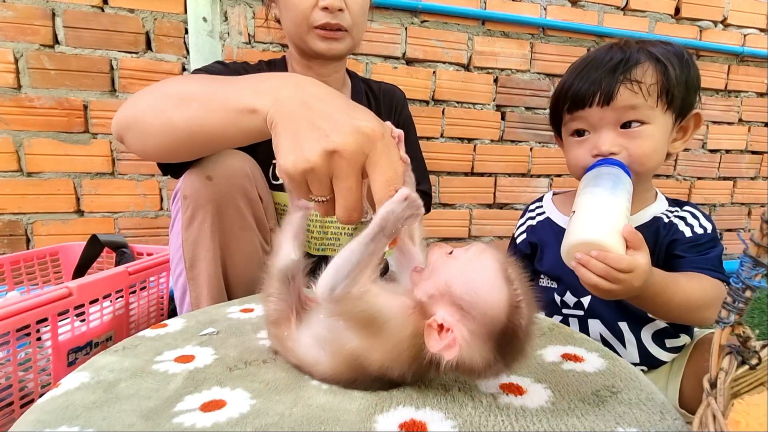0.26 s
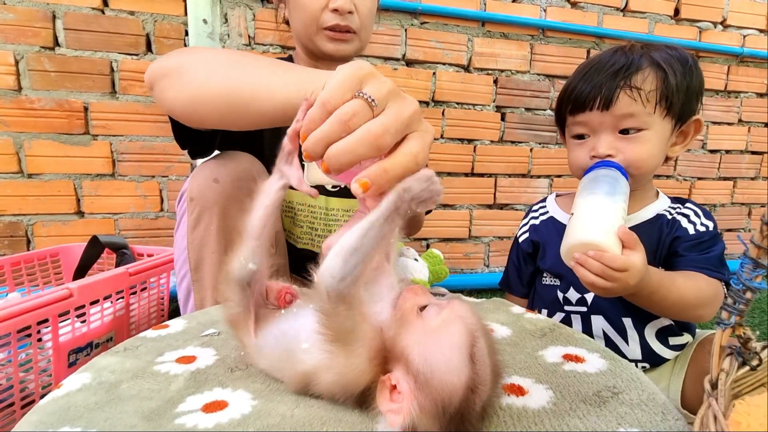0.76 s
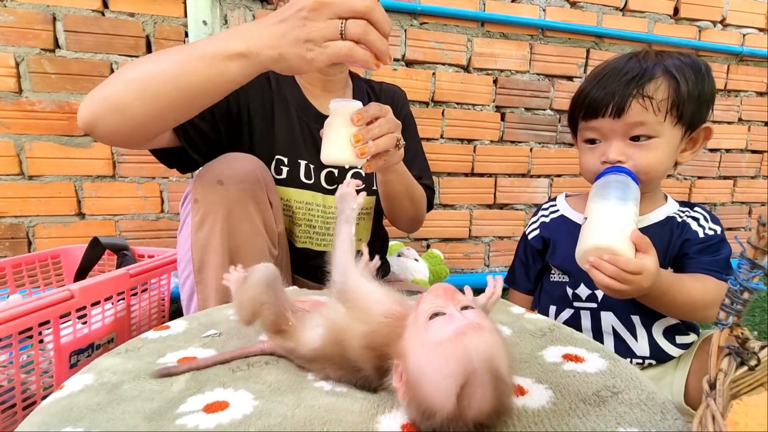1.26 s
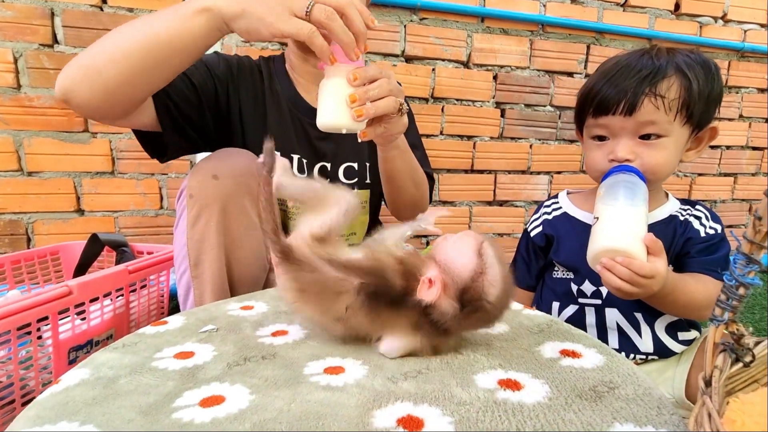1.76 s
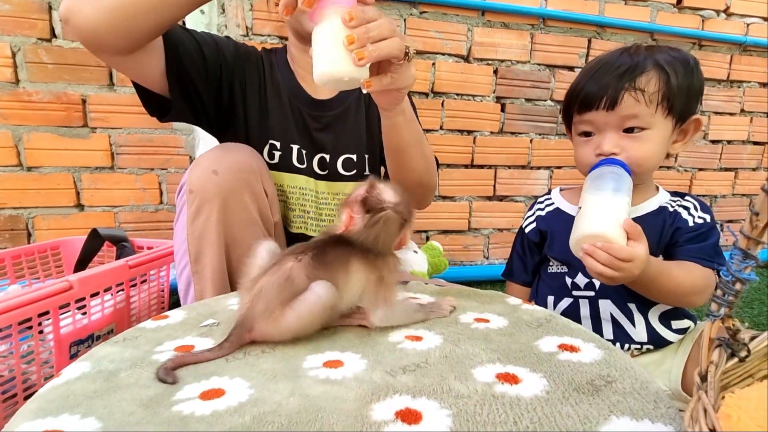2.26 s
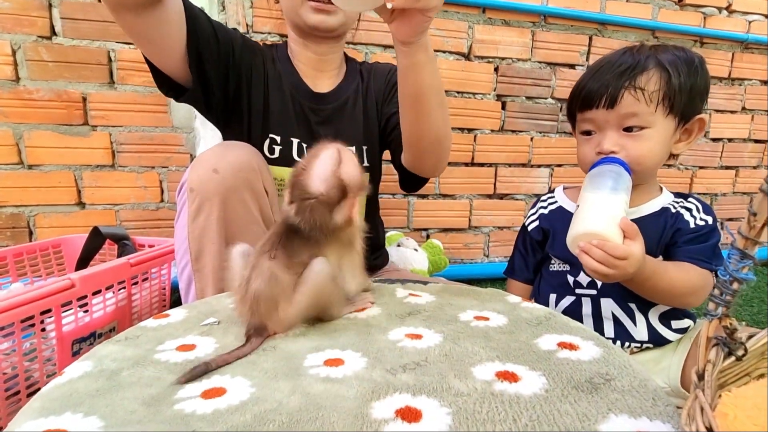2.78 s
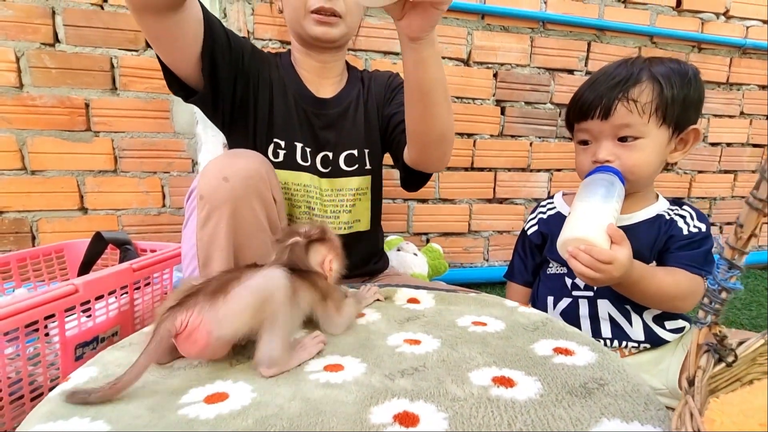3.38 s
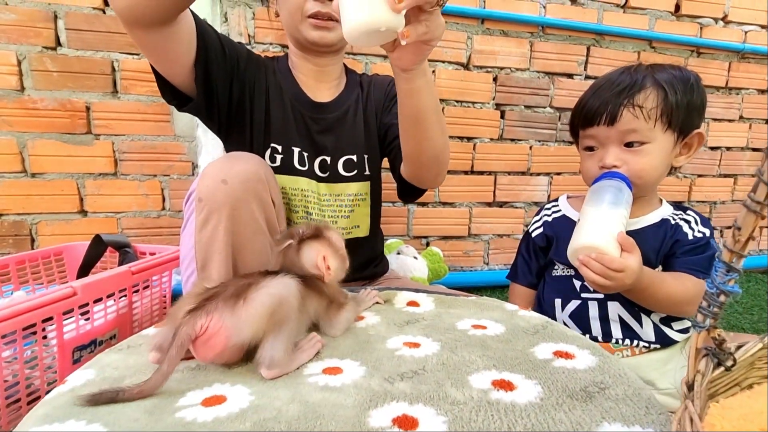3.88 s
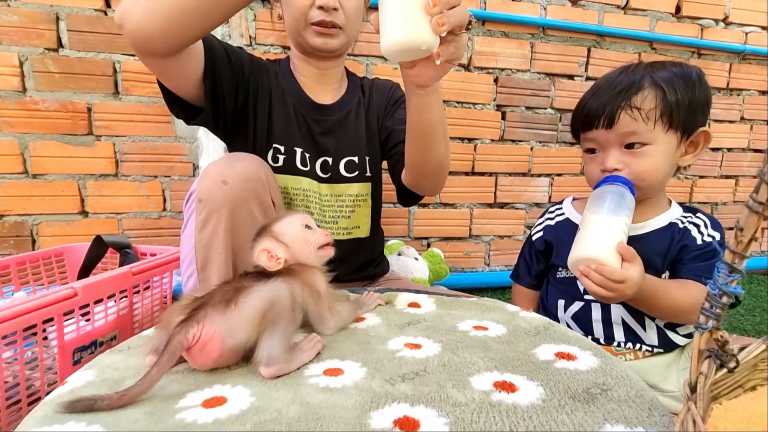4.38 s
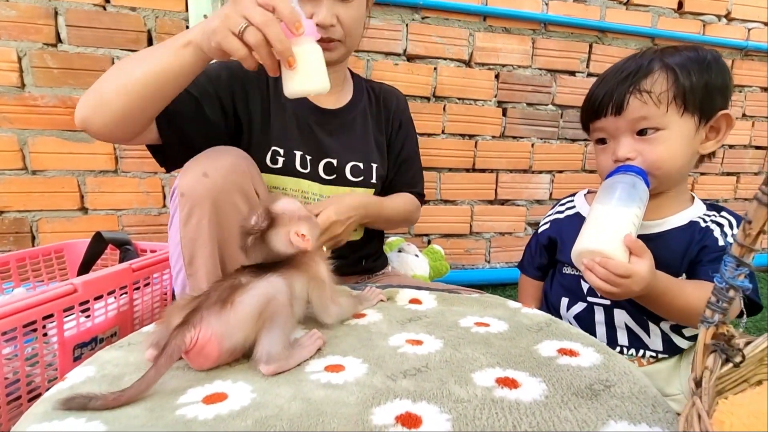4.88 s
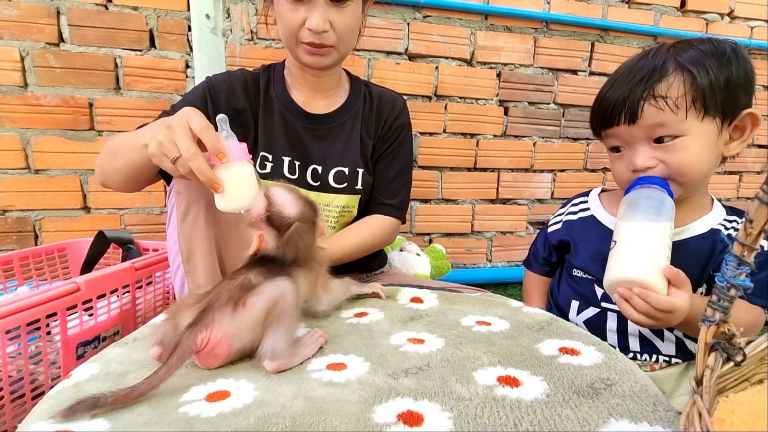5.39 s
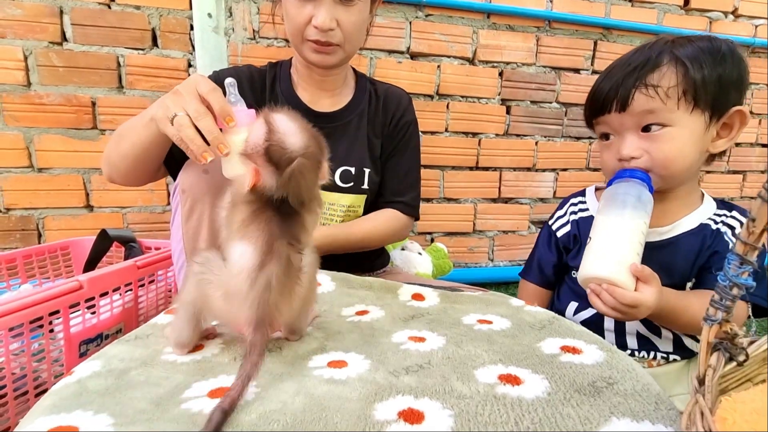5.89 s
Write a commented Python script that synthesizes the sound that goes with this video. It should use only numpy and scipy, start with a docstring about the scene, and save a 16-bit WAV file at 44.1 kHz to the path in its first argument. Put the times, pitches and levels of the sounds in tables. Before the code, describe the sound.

A hungry baby monkey shrieks and yelps in rapid, rasping high-pitched bursts, then tires into shorter yelps and hoarse low moans, close up.

```python
"""A hungry baby monkey cries on a blanket before a brick wall, close to two microphone ports.
Fold pulses pass a throat whose colour follows pitch and mouth: rasping screams leap to squeals,
yelps slide down, squawks arch, and slack folds end it all in hoarse low moans.
Short wavering tones make the first yelp's low tail, soft low grunts and a bright overtone atop one shriek.
Filtered noise scuffs the cloth; reflections, dull noise, a swelling rumble and a faint hum surround it."""
import sys
import numpy as np
from scipy import signal
from scipy.fft import rfft, irfft, next_fast_len
from scipy.io import wavfile
from scipy.ndimage import uniform_filter1d, minimum_filter1d

SR = 44100
rng = np.random.default_rng(int(sys.argv[2]) if len(sys.argv) > 2 else 0)


def bounce(signal):
    """Save signal as a 16-bit WAV file at the path given by the first command-line argument."""
    frames = np.transpose(np.atleast_2d(signal))
    limited = np.clip(frames, -1, 1)
    pcm = np.round(limited * 32767).astype(np.int16)
    wavfile.write(sys.argv[1], SR, pcm)


N = 270774
TIME = np.arange(N) / SR
EDGE_HZ = 16100  # top of the band, for the fold overtones and the final filter


def gain_of(db):
    """Decibels to amplitude."""
    return 10 ** (np.asarray(db) / 20)


def evened(x):
    """Scales to rms 1."""
    return x / np.sqrt(np.mean(x ** 2) + 1e-20)


def read(points, hz):
    """Reads (frequency [Hz], value) points on a log-frequency axis."""
    f, value = np.transpose(points)
    return np.interp(np.log(hz + 1), np.log(f + 1), value)


def add(mix, s, sound):
    """Mixes a sound in at time s."""
    part = mix[max(round(s * SR), 0):][:len(sound)]
    part += sound[:len(part)]


def shaped(x, response):
    """Filters x by a gain that is a function of frequency."""
    size = next_fast_len(x.shape[-1] + 2048)
    spectrum = rfft(x, size) * response(np.fft.rfftfreq(size, 1 / SR))
    return irfft(spectrum, size)[..., :x.shape[-1]]


def resonate(x, hz, width):
    """A steep resonance of gain 1: the same peak filter twice."""
    b, a = signal.iirpeak(hz, hz / width, SR)
    return signal.lfilter(b, a, signal.lfilter(b, a, x))


def flutter(top_hz):
    """Random wavering of rms 1, rolled off steeply above top_hz."""
    return evened(shaped(rng.standard_normal(N), lambda f: 1 / (1 + (f / top_hz) ** 4)))


def per_cycle(turns, cycles):
    """A random value that glides to a new one every so many cycles (at least one)."""
    return np.interp(turns / max(cycles, 1), np.arange(N), rng.standard_normal(N))


# Colour of the noise floor: (frequency [Hz], level [dB])
FLOOR_COLOUR = [(25, -11), (65, 1), (170, -11.5), (270, -18), (1600, -33), (4200, -24.5), (7000, -38.5),
                (16000, -51)]
# Swell of the rumble: (time [s], level [dB])
RUMBLE_SWELL = [(.08, -62), (.2, -39.5), (.46, -43), (.65, -48), (2.2, -59)]
HUM_HZ, HUM_DB, HUM_OCTAVE_DB = 87, -55, -7.5  # the octave is relative to the fundamental


def background(shared_hz=350, apart=0.67, floor_db=-53, rumble_hz=88, rumble_width_hz=50):
    """Dull noise shared by both ports in the bass, separate hiss, a booming rumble and a wavering hum."""
    noise = rng.standard_normal((3, N))
    air = evened(shaped(noise, lambda f: gain_of(read(FLOOR_COLOUR, f))))
    low = shaped(air, lambda f: 1 / (1 + (f / shared_hz) ** 4))
    hiss = (air - low)[:2]
    floor = gain_of(floor_db) * (low[2] + apart * low[:2] + hiss)
    boom = evened(resonate(rng.standard_normal(N), rumble_hz, rumble_width_hz))
    rumble = boom * gain_of(np.interp(TIME, *np.transpose(RUMBLE_SWELL)))
    phase = 2 * np.pi * np.cumsum(HUM_HZ * (1 + 0.0088 * flutter(top_hz=6.3))) / SR
    hum = evened(np.sin(phase) + gain_of(HUM_OCTAVE_DB) * np.sin(2 * phase))
    return floor + rumble + gain_of(HUM_DB) * hum


def echoes(x, near_db=-14, near_s=0.032, tail_db=-22, tail_t60=.31):
    """Quick sparse reflections from bodies and wall, with a faint dense tail."""
    t = np.arange(SR // 2) / SR
    sparse = rng.random((2, len(t))) < 1500 / SR  # about 1500 reflections per second
    near = rng.standard_normal((2, len(t))) * sparse * np.exp(-t / near_s) * (t > .002)
    tail = rng.standard_normal((2, len(t))) * (t > .008) * np.exp(-np.log(1000) * t / tail_t60)
    taps = (gain_of(near_db) * evened(near) + gain_of(tail_db) * evened(tail)) / np.sqrt(len(t))
    return signal.fftconvolve(x[None], taps, axes=1)[:, :N]


def scatter(x, count=8):
    """Short paths off hands, bottle and body come and go as the monkey tosses its head."""
    strength, longest_s, changes_per_s = .22, .003, 35
    out = np.zeros((2, N))
    for port in out:
        for delay in rng.uniform(0, longest_s, count):
            port += strength * per_cycle(TIME * changes_per_s, 1) * np.roll(x, int(delay * SR))
    return out


# The two ports hear the monkey differently: (frequency [Hz], left minus right [dB])
PORT_TILT = [(300, 2), (1300, 2.5), (2600, -4), (3200, -2), (4700, -11), (9000, 1.5), (12500, -3)]


def ports(x, lead=1.897, level_off_hz=1100):
    """The left port leads by a phase (radians) that levels off; the housing colours each side."""
    def response(f):
        ratio = gain_of(read(PORT_TILT, f))
        lag = np.exp(-1j * lead * np.tanh(f / level_off_hz))
        return np.array([ratio, lag]) * np.sqrt(2 / (1 + ratio ** 2))
    return shaped(x, response)


# The monkey tumbles and scrambles on the blanket: (start [s], length [s], level [dB])
CLOTH_SCUFFS = [(1.147, 0.15, -48.5), (2.863, 0.11, -44)]


def scuffs(low_hz=160, high_hz=230):
    """Dull puffs of band-limited noise: a small body rubbing on cloth."""
    def dull_band(f):
        return f ** 4 / (f ** 4 + low_hz ** 4) / (1 + (f / high_hz) ** 3)
    cloth = evened(shaped(rng.standard_normal(N), dull_band))
    puffs = 0
    for s, length, db in CLOTH_SCUFFS:
        puffs = puffs + gain_of(db) * np.sin(np.pi * np.clip((TIME - s) / length, 0, 1))
    return cloth * puffs


def note(length, hz, level_db, waver, count, slope_db=0):
    """A short wavering tone with count partials, each weaker than the last when slope_db is negative."""
    size = int(length * SR)
    turns = np.cumsum(hz * (1 + waver * flutter(top_hz=199.4)[:size])) / SR
    tone = sum(gain_of(slope_db * k) * np.sin(2 * np.pi * (k + 1) * turns) for k in range(count))
    return gain_of(level_db) * evened(tone * signal.windows.tukey(size, .5))


# Low tail of the first yelp, then soft low grunts: (start [s], length [s], pitch [Hz], level [dB])
LOW_NOTES = [(0.095, 0.019, 458, -35), (1.001, .02, 427.5, -49), (2.149, 0.046, 346.8, -45),
             (3.152, 0.033, 359, -48), (3.426, 0.027, 338, -57)]


def yelp_tail_and_grunts():
    """Brief low tones with five partials on an unsteady pitch."""
    out = np.zeros(N)
    for s, *low_note in LOW_NOTES:
        add(out, s, note(*low_note, waver=0.15, count=5, slope_db=-5.5))
    return out


# A thin, bright overtone at the top of one shriek: (length [s], pitch [Hz], level [dB])
BRIGHT_OVERTONE = (0.027, 13900, -19)
OVERTONE_S = .603  # start


def overtone():
    """A single, almost steady high partial."""
    out = np.zeros(N)
    add(out, OVERTONE_S, note(*BRIGHT_OVERTONE, waver=0.002, count=1))
    return out


# The creak's rate is a share of the pitch it is given; it fades out above CREAK_BELOW_HZ
CREAK_BELOW_HZ, CREAK_SHARE, CREAK_DEPTH = 1110, 0.45, 1.79


def creak(pitch, rough, waver=0.14):
    """Slack folds creak: a slower, unsteady beat chops low, rough calls and makes them hoarse."""
    turns = np.cumsum(CREAK_SHARE * pitch * (1 + waver * flutter(top_hz=61.4))) / SR
    depth = CREAK_DEPTH * rough / (1 + (pitch / CREAK_BELOW_HZ) ** 10)
    return 1 + depth * np.cos(2 * np.pi * turns)


def slack_folds(pitch, rough):
    """Loose folds: a little roughness makes every other pulse differ, more breaks the voice into a rasp."""
    doubled_at, halves, jitter, flare, smear, air = .4, .7, .13, .7, .37, .7
    beat = np.cumsum(pitch) / SR
    turns = np.cumsum(pitch * (1 + jitter * rough ** 2 * per_cycle(beat, 1.5))) / SR
    doubling, pulses = halves * np.minimum(rough / doubled_at, 1), 0
    for k in range(1, 29):  # partials of half the pitch; the odd ones carry the doubling
        level = (doubling if k % 2 else 1) * np.exp(flare * rough * per_cycle(beat, 10))
        pulses += level * np.cos(np.pi * k * turns + smear * k ** 2)
    return pulses * creak(pitch / 2, rough ** 2) + air * rough * rng.standard_normal(N)


# Resonances of the moaning throat:
# (centre [Hz], width [Hz], level with pursed lips [dB], level with open mouth [dB])
MOAN_RESONANCES = [(466, 105.3, -12, -5), (688, 390, 0.5, -9.5), (1219.2, 320, -4, -1.5),
                   (1560, 173, -5.5, 1), (2150, 260, -21.5, -3), (2810, 590, -17.5, -6.5),
                   (4180, 610, -26.5, 1), (10800, 2900, -35.5, -23)]
# Hoarse moans, one curve each: (time [s], pitch [Hz], level [dB], roughness [0-1], mouth opening [0-1])
MOAN_CURVES = [
    [(5.003, 741.8, -37, .8, 0.68), (5.085, 600.8, -42.5, 0.7, 0.24), (5.14, 691, -34, 0.7, 0.08),
     (5.172, 660.4, -41.5, 0.7, 0.37), (5.192, 785, -32, 0.17, 0.5), (5.245, 648.7, -39.5, 0, 0.34)],
    [(5.408, 800.7, -43.5, 0.6, 0), (5.49, 761.3, -44, 0.54, 0.21), (5.542, 736, -33, 0.71, 0.42),
     (5.6, 704.4, -38.5, 0.71, 0.34), (5.627, 817.1, -33, 0.42, .3), (5.64, 763, -53.5, 0.26, 0.5)],
    [(5.789, 916.1, -39, 0.6, 0.8), (5.843, 1173, -29, 0.68, 0.7), (5.872, 982.4, -42.5, 0.8, 0.6)],
    [(5.893, 1058, -33.5, 0.65, 0.91), (5.93, 1499, -20.5, 0.55, 1), (5.963, 973.2, -40, 0.5, 0.66),
     (5.994, 1239, -33, 0, 0.82), (6.013, 884.6, -34.5, 0.2, 0.11)],
]


def moans():
    """Slack folds sound through fixed resonances whose levels follow the parting of the lips."""
    s, *controls = np.vstack(MOAN_CURVES).T
    pitch, db, rough, opening = (np.interp(TIME, s, c) for c in controls)
    source = slack_folds(pitch, np.clip(rough, 0, 1))
    voice = 0
    for hz, width, shut, wide in MOAN_RESONANCES:
        voice = voice + gain_of(shut + (wide - shut) * opening) * resonate(source, hz, width)
    sounding = sum(1. * (TIME > c[0][0]) * (TIME < c[-1][0]) for c in MOAN_CURVES)
    gate = uniform_filter1d(sounding, size=260)
    levelled = voice / np.sqrt(uniform_filter1d(voice ** 2, size=700))
    return levelled * gate * gain_of(db)


def moments(length, count=120):
    """Times through a call, in seconds and as a share of its length."""
    share = np.linspace(0, 1, count)
    return share * length, share


# In every call, tension scales the pitch that picks the throat colour, lips scale the
# resonances, and the open mouth rings at one frequency.
# Squawks: (start [s], length [s], top pitch [Hz], bend of the arch [0-1], level [dB],
# roughness [0-1], tension [ratio], lips [ratio], ring [Hz])
SQUAWK_CALLS = [ (0.351, 0.036, 2333, 0.39, -14, 0.38, 0.86, 1.296, 3970),
                (2.328, 0.027, 1593, 0.56, -20, 0.35, 1.1, 1.19, 4527),
                (2.532, 0.019, 1203, 0.28, -19, 0.29, 1.426, 1.007, 4443),
                (3.583, 0.024, 1453, 0.5, -25.5, 0.25, 1.3, 0.92, 1364),
                (4.949, 0.054, 1169, 0.73, -24.5, 0.14, 0.65, 1.17, 4020)]
SQUAWK_CREST, SQUAWK_EDGE_DB = .35, -10  # share of the length where pitch tops; relative level at both ends


def squawk(start, length, top_hz, bend, level_db, rough, *mouth):
    """Pitch and level rise and fall in one arch each."""
    t, share = moments(length)
    pitch = top_hz * (1 - bend * (share - SQUAWK_CREST) ** 2)
    db = level_db + SQUAWK_EDGE_DB * (2 * share - 1) ** 2
    return np.array([start + t, pitch, db, np.full_like(t, rough)]), (*mouth, 1)


# Yelps: (start [s], length [s], attack [s], top pitch [Hz], last pitch [Hz], level [dB],
# roughness [0-1], tension [ratio], lips [ratio], ring [Hz])
YELP_CALLS = [ (0.054, 0.041, 0.012, 2222, 1399, -10.5, 0.47, 1.13, 1.015, 4030),
              (0.284, 0.058, 0.0057, 2018, 1342, -12, 0.65, 1.056, 1.08, 4200),
              (0.665, 0.038, 0.003, 2742, 2099, -15.5, 0.27, 0.92, 1.19, 4350),
              (0.9, 0.056, 0.02, 2197, 1301, -12.5, 0.51, 1.06, 1.11, 3310),
              (2.242, 0.061, 0.011, 2163, 1025, -15.5, 0.6, 0.99, 1.056, 3450),
              (2.505, 0.031, 0.0088, 1500, 1245, -14, 0.82, 1.15, 0.98, 4366),
              (3.494, 0.066, 0.024, 1697, 1101, -17, 0.42, 0.84, 1.096, 2750),
              (3.785, 0.047, 0.016, 1431, 804.2, -19.5, 0.48, 0.86, 1.035, 2741),
              (4.084, 0.044, 0.0093, 1293, 720.3, -25.5, 0.38, 0.82, 1.11, 1240),
              (4.28, 0.049, 0.011, 1240, 797.2, -20.5, 0.55, 1.14, 1.13, 1140),
              (4.493, 0.059, 0.0059, 1736, 896, -13, 0.4, 1.097, 1.11, 5300),
              (4.714, 0.06, 0.015, 1929, 956, -13, 0.3, 1.03, 1.024, 5200)]
YELP_ONSET_DB, YELP_FADE_DB, YELP_FADE_CURVE = -7, -12, 1.35
YELP_HOOK, YELP_CREST = .12, .55  # pitch starts this share low and tops at this share of the attack
YELP_SLIDE_CURVE, YELP_FRAY = .8, .45  # slide is steepest at first; roughness grows by this share
YELP_GLIDE = .85  # the ring sinks by this ratio as the mouth closes


def yelp(start, length, attack, top_hz, last_hz, level_db, rough, *mouth):
    """The pitch hooks up in a quick attack, then slides down and frays as the air runs out."""
    t, share = moments(length)
    spent = np.clip((t - attack) / (length - attack), 0, 1)
    onset_db = YELP_ONSET_DB * np.maximum(1 - t / attack, 0)
    db = level_db + onset_db + YELP_FADE_DB * spent ** YELP_FADE_CURVE
    crest = YELP_CREST * attack
    hook = YELP_HOOK * np.maximum(1 - t / crest, 0) ** 2
    slide = np.clip((t - crest) / (length - crest), 0, 1) ** YELP_SLIDE_CURVE
    pitch = top_hz * (1 - hook) + (last_hz - top_hz) * slide
    return np.array([start + t, pitch, db, rough * (1 + YELP_FRAY * (share - .5))]), (*mouth, YELP_GLIDE)


# Screams: (start [s], length [s], release [s], first pitch [Hz], late pitch [Hz], drop [0-1], level [dB],
# level change as it tires [dB], roughness [0-1], tension [ratio], lips [ratio], ring [Hz], ring glide [ratio])
SCREAM_CALLS = [ (0.534, 0.117, 0.006, 2250, 2394, 0.02, -10.5, -10, 0.6, 1.107, 1.114, 4040, 1.07),
                (1.118, 0.28, 0.022, 2108, 2454, 0.09, -12, -2, 0.71, 0.99, 1.054, 3947, 1.147),
                (1.548, 0.17, 0.037, 2120, 2341, 0.38, -12.5, -3.5, 0.5, 1.082, 1.006, 3780, 1.25),
                (1.85, 0.26, 0.064, 2104, 2316, 0.17, -16.5, 1, 0.66, 0.94, 1.143, 4020, 1.39),
                (2.691, 0.109, 0.0247, 2060, 2265, 0.16, -15, 1.5, 0.58, 0.91, 1.075, 2976, 1.6),
                (2.919, 0.21, 0.028, 2021, 2689, 0.17, -10.5, -8, 0.71, 0.87, 1.137, 3950, 1.33),
                (3.226, 0.13, 0.024, 2030, 1983, 0.29, -18, -3.5, 0.45, 1.034, 0.96, 2841, 2.07)]
# The throat squeezes shut, the pitch bends mostly up towards a squeal and the level chokes:
# (time [s], half width [s], pitch [Hz], level change [dB])
THROAT_SQUEEZES = [(0.613, 0.026, 3199, -10), (1.135, 0.0031, 2293, -9.5), (1.183, 0.0085, 3198, -15),
                   (1.211, 0.016, 3920, -10), (1.309, 0.016, 3293, -14), (1.611, 0.0064, 2750, -17),
                   (1.637, 0.013, 3160, -15.5), (1.913, 0.02, 3210, -14), (1.999, 0.0061, 2520, -10.5),
                   (2.75, 0.0086, 1821, -9), (3.003, 0.03, 3095, -8.5)]
# The throat slackens and the voice locks into a tone that is mostly lower and clearer:
# (time [s], half width [s], pitch [Hz], level change [dB], roughness [0-1])
VOICE_CLEARINGS = [(0.562, 0.016, 1856, -3, 0.4), (1.394, 0.0059, 2200, 17.5, 0.08),
                   (1.59, 0.012, 1853, 5.5, 0.24), (2.737, 0.013, 1589, -1.5, 0.5),
                   (2.964, 0.0065, 2070, -6, 0.2), (3.267, 0.023, 1480, 3.5, 0.36)]
SCREAM_ATTACK_S, SCREAM_ONSET_DB, SCREAM_RELEASE_DB, RELEASE_ROUGH = 0.0086, -14.5, -17.5, .12


def scream(start, length, release, first_hz, late_hz, drop, level_db, tiring_db, rough, *mouth):
    """A rasping hold on a drifting pitch, broken by squeezes and clearings; the release clears and falls."""
    t, share = moments(length)
    held = np.minimum(t / (length - release), 1)
    letting_go = np.clip((t - length) / release + 1, 0, 1)
    pitch = (first_hz + (late_hz - first_hz) * held) * (1 - drop * letting_go)
    onset_db = SCREAM_ONSET_DB * np.maximum(1 - t / SCREAM_ATTACK_S, 0)
    db = level_db + onset_db + tiring_db * held + SCREAM_RELEASE_DB * letting_go ** 2
    rough = rough + (RELEASE_ROUGH - rough) * np.minimum(2 * letting_go, 1)
    for s, width, hz, choke_db in THROAT_SQUEEZES:
        grip = np.exp(-((start + t - s) / width) ** 2)
        pitch, db = pitch + (hz - pitch) * grip, db + choke_db * grip
    for s, width, hz, lift_db, clear in VOICE_CLEARINGS:
        lock = np.exp(-((start + t - s) / width) ** 2)
        pitch, db = pitch + (hz - pitch) * lock, db + lift_db * lock
        rough = rough + (clear - rough) * np.minimum(2 * lock, 1)
    return np.array([start + t, pitch, db, rough]), mouth


def calls():
    """Yelps, squawks and screams by time: each a course (s, pitch, level, roughness) and a mouth shape."""
    every = [yelp(*row) for row in YELP_CALLS]
    every += [squawk(*row) for row in SQUAWK_CALLS]
    every += [scream(*row) for row in SCREAM_CALLS]
    return sorted(every, key=lambda call: call[0][0, 0])


def folds(pitch, rough, soft_hz=5500, air=.36, air_hz=900):
    """Fold pulses; roughness makes them erratic, splits them into twos and threes and lets air rush through."""
    jitter, lurch, shimmer, splitting, smear = .075, .09, .65, 1.45, .5
    beat = np.cumsum(pitch) / SR
    wander = jitter * per_cycle(beat, 2) + lurch * rough * per_cycle(beat, 10)
    turns = np.cumsum(pitch * (1 + rough * wander)) / SR
    turn, partial, pulses = np.exp(2j * np.pi * turns), 1, np.zeros(N)
    for k in range(1, 21):
        partial = partial * turn
        closure = rough + (1 - rough) / (1 + (k * pitch / soft_hz) ** 4)  # a clear voice has weak overtones
        flare = np.exp(0.92 * rough * per_cycle(beat, 20))  # overtones flare and drop
        wave = (partial * np.exp(1j * smear * k ** 2)).real
        pulses += wave * closure * (k * pitch < EDGE_HZ) * flare
    groups = sum(per_cycle(beat, 20) * np.cos(2 * np.pi * turns / size) for size in (2, 3))
    unevenness = shimmer * per_cycle(beat, 1) + splitting * groups
    pulses *= np.sqrt(2 * pitch / EDGE_HZ) * (1 + rough * unevenness)
    breath = rng.standard_normal(N) * (1 + .5 * turn.real)
    rush = shaped(breath, lambda f: f / np.hypot(f, air_hz))
    return (1 - rough) * pulses + air * rough * rush


# Throat colour in each register:
# (frequency [Hz], whine level [dB], yelp level [dB], shriek level [dB], squeal level [dB])
THROAT_COLOUR = [(297, -6.5, -10, -12, -10), (658.2, 0.5, -10, -10, -16), (1340.8, -9.5, 0, -26.5, -22),
                 (1890, -9, -12, -16, -29), (2786, -9.5, 1.5, -9, -25), (3660, -6.5, 3.5, 2, -24),
                 (4230, -10, -3, 2, -2.5), (4660, -7, 4.5, 0.5, -9.5), (6780, -19, -14.5, -3.5, 0.5),
                 (10200, -27, -16, -24.5, -3), (15700, -32.5, -22, -27, -13)]
RING_DB, RING_OCTAVES = 9.5, 0.19  # height and half width of the mouth's ring
LOW_CUT_HZ = 220  # so small a throat radiates little below this


def throat_db(hz, register, lips, ring_hz):
    """The throat's resonances in one register, plus the ring of the open mouth, without bass."""
    ring = RING_DB * np.exp(-(np.log2((hz + 1) / ring_hz) / RING_OCTAVES) ** 2)
    no_bass = -10 * np.log10(1 + (LOW_CUT_HZ / (hz + 1)) ** 6)
    return read(np.array(THROAT_COLOUR)[:, [0, register + 1]], hz / lips) + ring + no_bass


# The throat tightens as pitch rises; whine, yelp, shriek and squeal in turn: (pitch [Hz])
REGISTER_PITCHES = [636, 1380, 1942, 3070]


def cries():
    """The folds sound through a throat whose colour follows pitch and mouth shape."""
    edge_s = .003
    every = calls()
    s, hz, db, rough = np.hstack([course for course, mouth in every])
    s = np.maximum.accumulate(s)  # where calls overlap, time never runs back
    pitch, level_db, rough = (np.interp(TIME, s, c) for c in (hz, db, np.clip(rough, 0, 1)))
    source, out = folds(pitch, rough) * creak(pitch, rough), np.zeros(N)

    def through_throat(sound, register, lips, ring_hz):
        return shaped(sound, lambda f: gain_of(throat_db(f, register, lips, ring_hz)))

    for course, (tension, lips, ring_hz, glide) in every:
        start, end = course[0, 0], course[0, -1]
        on = (TIME > start - edge_s) & (TIME < end + edge_s)
        voice = 0
        for k, share in enumerate(np.eye(len(REGISTER_PITCHES))):
            early = through_throat(source[on], k, lips, ring_hz)
            late = through_throat(source[on], k, lips, ring_hz * glide)
            coloured = early + (late - early) * np.linspace(0, 1, len(early))
            voice = voice + np.interp(tension * pitch[on], REGISTER_PITCHES, share) * coloured
        voice /= np.sqrt(uniform_filter1d(voice ** 2, size=700))  # even out before setting the level
        from_edge = np.minimum(TIME[on] - start, end - TIME[on])
        opening = np.clip((from_edge + edge_s) / edge_s, 0, 1)
        out[on] += voice * opening ** 2 * gain_of(level_db[on])
    return out


def monkey():
    """One animal's whole voice: cries, moans, low notes and one bright overtone."""
    return cries() + moans() + yelp_tail_and_grunts() + overtone()


def scene():
    """The monkey, its reflections, its scuffing and the background."""
    voice = monkey()
    return ports(voice + scatter(voice)) + echoes(voice) + background() + scuffs()


def record(dry):
    """A quick limiter holds the loudest peaks; then the band limit."""
    ceiling, hold = .9, 100  # full scale = 1; samples
    room = ceiling / np.maximum(abs(dry).max(0), ceiling)
    limited = dry * uniform_filter1d(minimum_filter1d(room, 2 * hold), hold)
    band = signal.firwin(255, EDGE_HZ, window="blackman", fs=SR)
    return signal.oaconvolve(limited, band[None], "same")


dry = scene()
out = record(dry)
bounce(out)
```